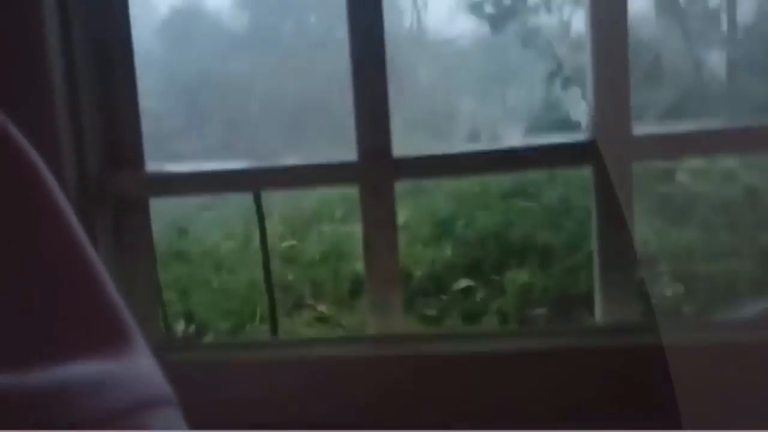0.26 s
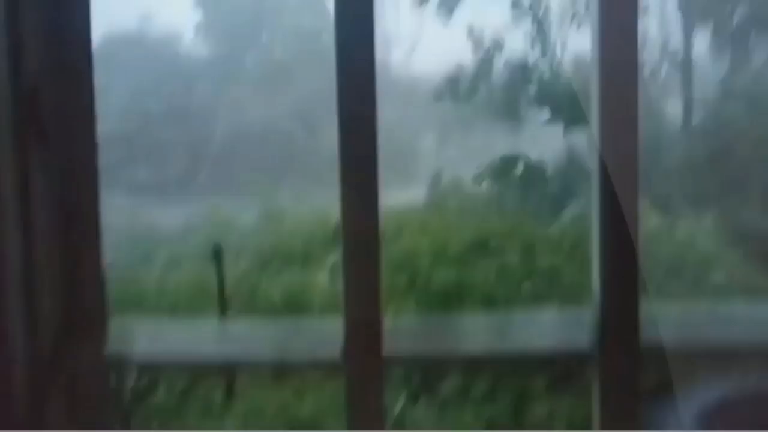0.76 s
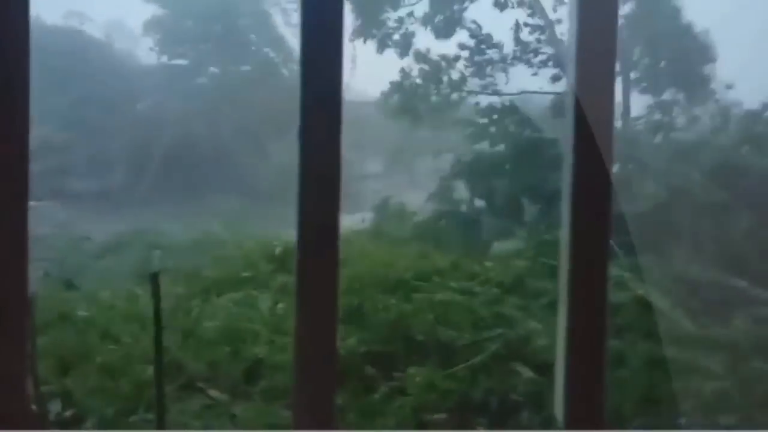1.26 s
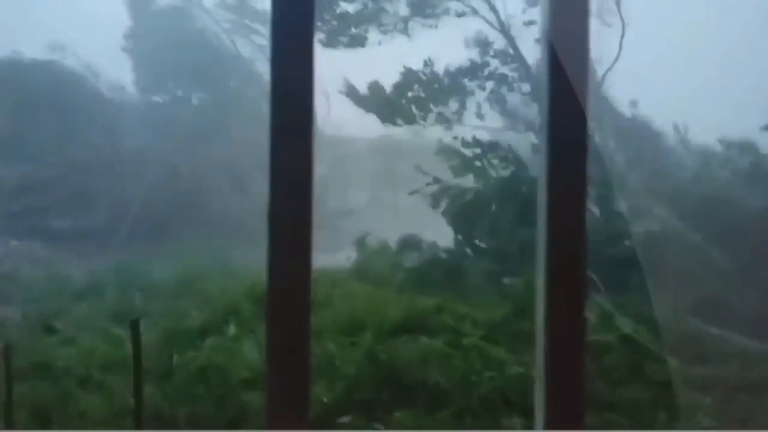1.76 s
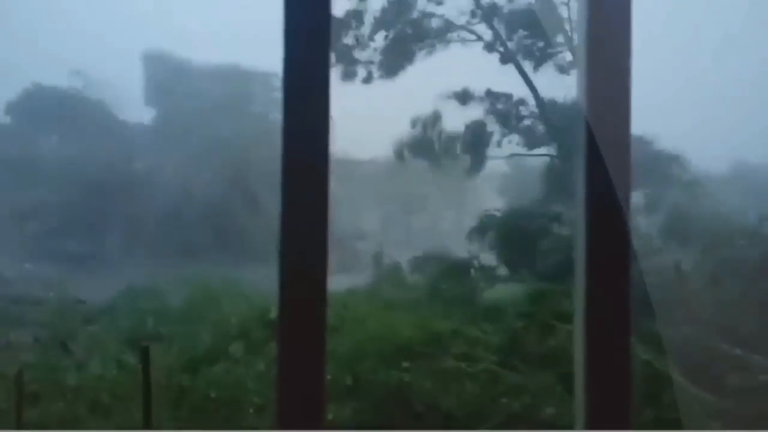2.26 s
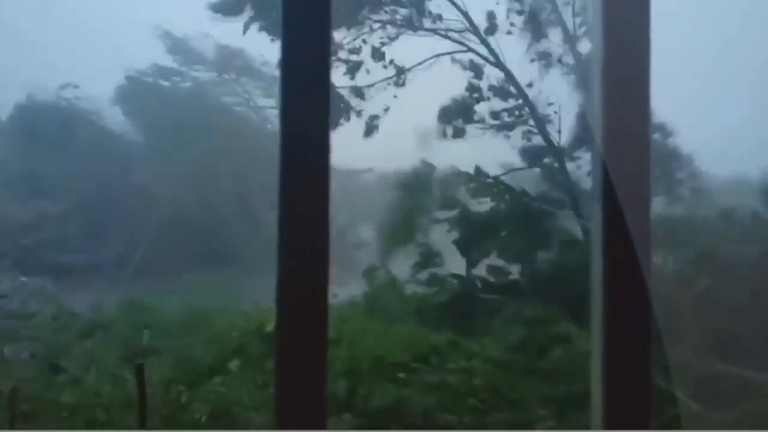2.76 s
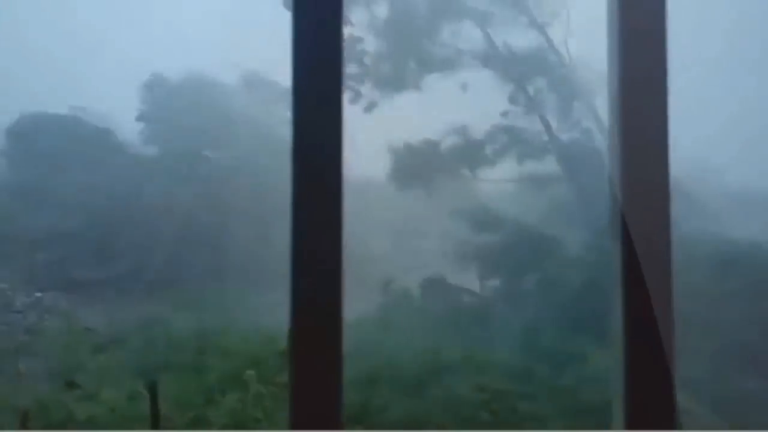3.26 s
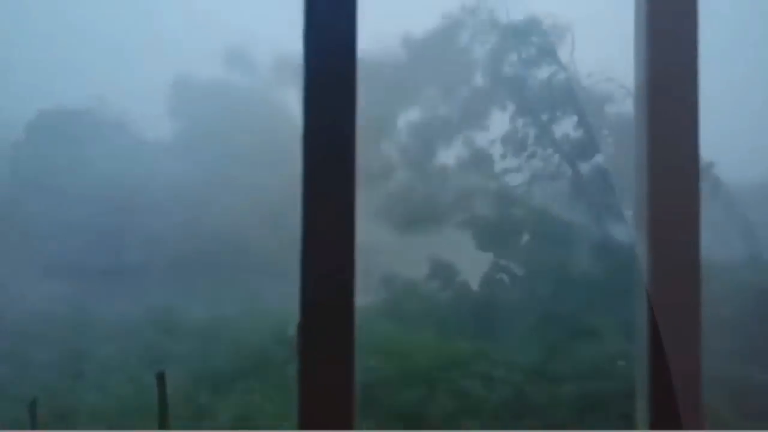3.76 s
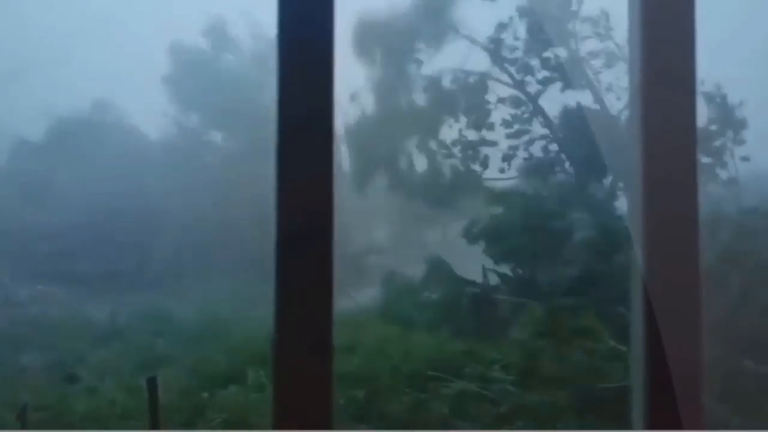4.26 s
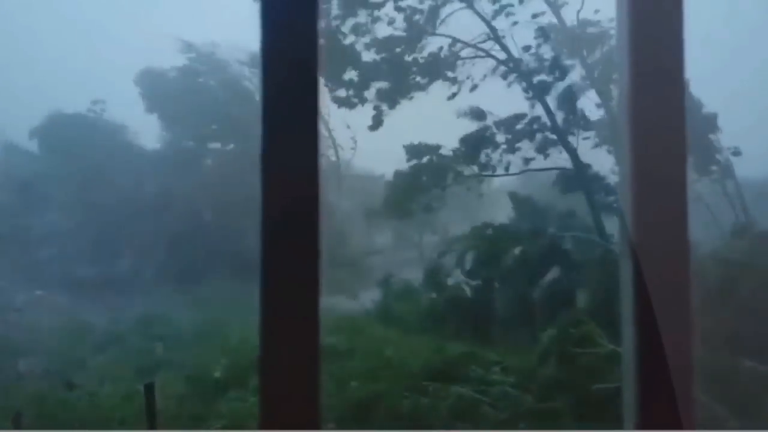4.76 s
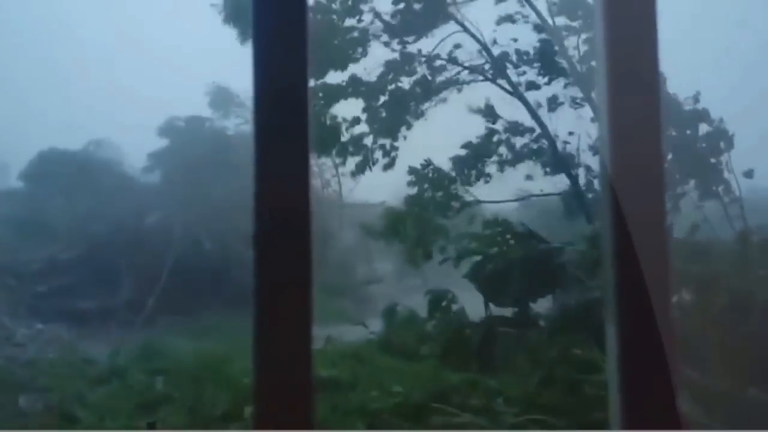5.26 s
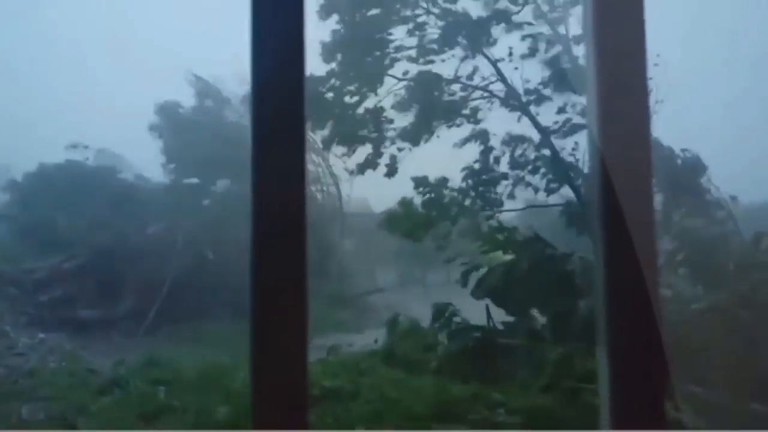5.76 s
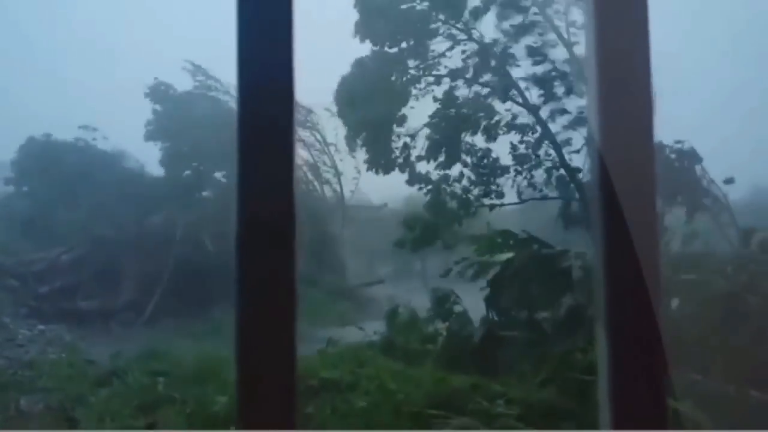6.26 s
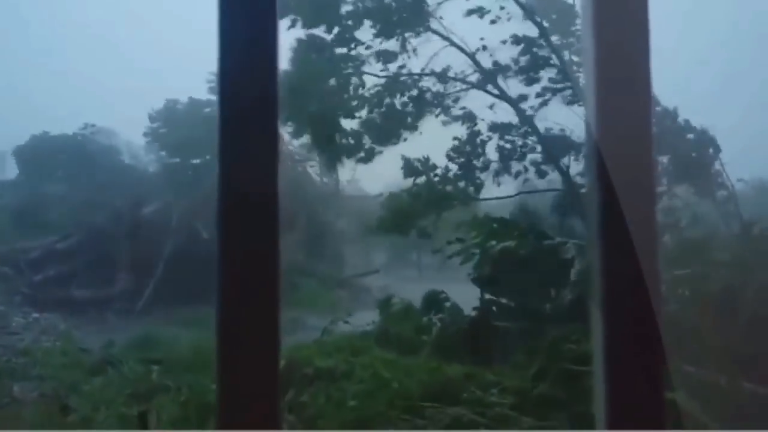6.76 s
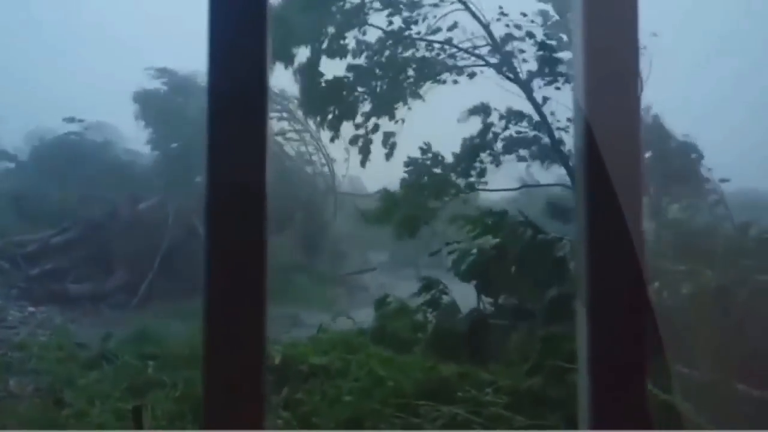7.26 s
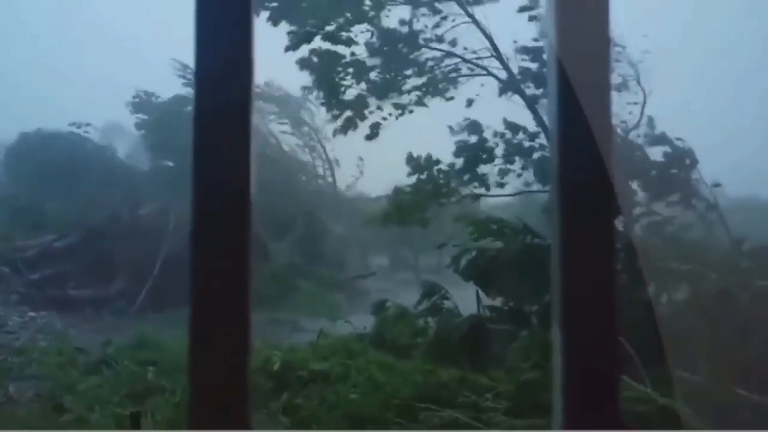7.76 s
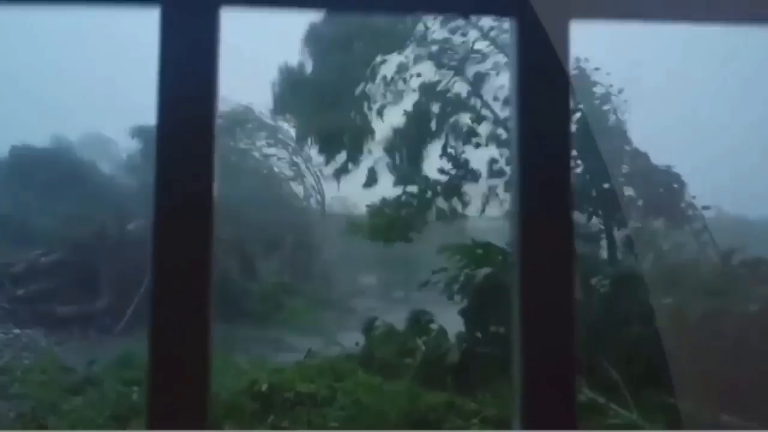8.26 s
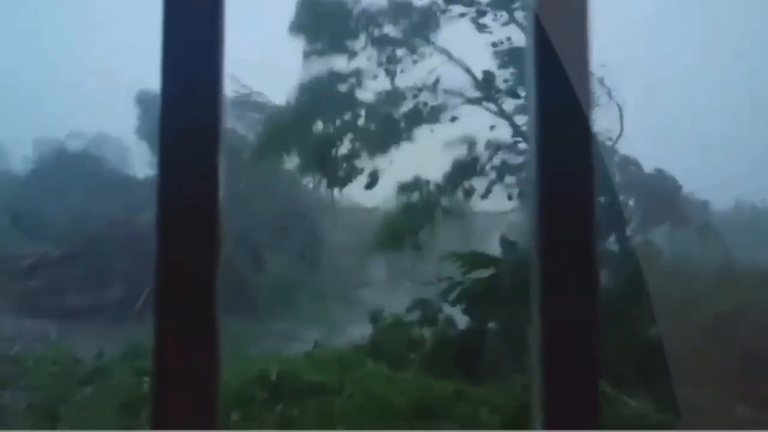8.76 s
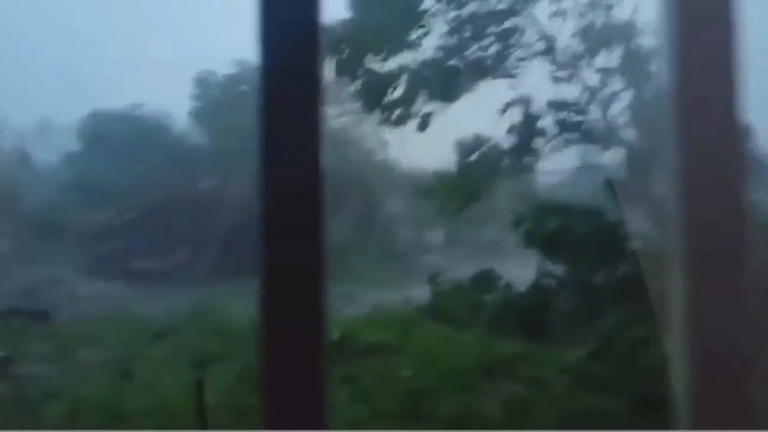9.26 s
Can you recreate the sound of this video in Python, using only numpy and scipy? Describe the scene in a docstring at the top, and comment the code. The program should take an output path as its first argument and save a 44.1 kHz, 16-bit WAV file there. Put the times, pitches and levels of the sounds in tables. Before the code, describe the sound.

A violent storm heard from inside a house near a window. Wind roars low in the trees, moans around the walls and howls with a wavering mid pitch, under a dense rush and hiss of rain. Water spatters sharply on the glass at the start, soon after, and again around the middle. The rain strengthens early and stays heavy. A hand-held microphone gives a soft rub and knocks near three seconds.

```python
"""Hurricane behind a house window

Wind roars in the trees, moans round the house and howls at the window: noise shaped by broad resonances.
Rain rushes and hisses against the wall: turbulent noise mixed with random single drops, under a fine mist.
Sharp gusts fling volleys of drops at the ringing pane and whistle in a gap; the storm's level shifts after most.
The hand-held microphone is jostled briefly: a rub of the grip and soft low knocks on its case."""
import sys
import numpy as np
from scipy import signal
from scipy.fft import rfft, irfft
from scipy.io import wavfile
from scipy.ndimage import map_coordinates

SR = 44100
rng = np.random.default_rng(int(sys.argv[2]) if len(sys.argv) > 2 else 0)


def store_wav(level_fs):
    """Save 16-bit WAV to argv[1]."""
    pcm = np.round(np.clip(np.atleast_2d(level_fs), -1, 1) * 32767)
    wavfile.write(sys.argv[1], SR, pcm.T.astype(np.int16))


N = 418950
TIME = np.arange(N) / SR   # seconds
FREQS = np.maximum(np.fft.rfftfreq(N, 1 / SR), 1)   # Hz, kept above zero for the logarithms

# Gusts that fling water at the pane. Each row: start in seconds, rise in seconds, decay in seconds,
# volley level in dB, pane pitch in Hz, whistle pitch at its loudest in Hz, whistle half-width in Hz,
# whistle level in dB, brief treble level drop in dB (negative: a lift), lull in dB (negative: a swell),
# lull length in seconds.
GUSTS = [(0.0, 0.0042, 0.11, -11.5, 930, 1850, 145, -29, 1, 0, 0.28),
         (0.329, 0.0097, 0.046, -16, 1060, 1660, 35, -24, 0.5, 0, 0.48),
         (1.07, 0.0057, 0.026, -16, 974, 2150, 151, -32, 0, -2, 0.88),
         (4.522, .04, 0.073, -16, 1030, 1820, 130, -19, 3.5, 4.5, 0.79),
         (5.509, 0.013, 0.05, -16, 1010, 2400, 450, -20, 11, 6, 1.04),
         (6.204, 0.014, 0.068, -16.5, 870, 1150, 100, -30, -1, -1, 0.18),
         (8.945, .02, 0.066, -32, 985, 2000, 249, -25, 1, -1.5, 0.18)]


def from_db(db):
    """Level is logarithmic: 20 dB is a tenfold amplitude."""
    return 10 ** (np.asarray(db) / 20)


def rms_one(x):
    """Mean-square normalisation: scale to unit power."""
    return x / np.sqrt(np.mean(x ** 2) + 1e-20)


def in_time(rows):
    """Linear interpolation: every column after the time column, read at each sample."""
    seconds, *columns = np.transpose(rows)
    return [np.interp(TIME, seconds, column) for column in columns]


def colour(points):
    """Spectral envelope: gain from (Hz, dB) points on a log-frequency axis, falling steeply past the ends."""
    hz, db = np.transpose(points)
    outside = np.minimum(FREQS / hz[0], 1) * np.minimum(hz[-1] / FREQS, 1)
    return from_db(np.interp(np.log(FREQS), np.log(hz), db)) * outside ** 4


def resonances(modes, base_hz=1):
    """Damped modes: each peak's amplitude halves about one width from its centre; their powers add."""
    power = 0
    for place, width, db in modes:
        detuning = (FREQS ** 2 - (place * base_hz) ** 2) / (2 * FREQS * width)
        power = power + (from_db(db) / (1 + detuning ** 2)) ** 2
    return np.sqrt(power)


def drift(rate):
    """Low-passed chance: a random wander of spread 1, weakened above rate in Hz."""
    spectrum = rfft(rng.standard_normal(N)) / (1 + (FREQS / rate) ** 2)
    return rms_one(irfft(spectrum, N))


def stereo(source, gain):
    """Mid and side decomposition: unrelated signals share a colour; a weak side part sets the width."""
    # Stereo width. Each row: frequency in Hz, side level relative to mid in dB.
    width_curve = [(200, -31.5), (1200, -53), (2800, -50.5), (4000, -18), (5200, -32), (7000, -20),
                   (9000, -12), (13000, -9)]
    balance = [np.ones(len(FREQS)), colour(width_curve)]
    mid, side = irfft(rfft(source) * gain * balance, N)
    return rms_one(np.array([mid + side, mid - side]))


def turbulence(gain, eddy_db, eddy_rate, patch_hz, size=1024):
    """Turbulent noise: patches of the time-frequency plane swell and fade as eddies pass."""
    hz, seconds, frames = signal.stft(rng.standard_normal((2, N)), SR, nperseg=size)
    places = np.meshgrid(hz / patch_hz, seconds * eddy_rate, indexing="ij")
    eddies = map_coordinates(rng.standard_normal((size, size)), places, order=1, mode="wrap")
    _, noise = signal.istft(frames * from_db(eddy_db * eddies), SR)
    return stereo(noise[:, :N], gain)


def drops(gain, per_s, size_db):
    """Poisson impacts: impulses at random times and of random sign excite a fixed spectrum."""
    # a positive size_db gives a tail of large drops, a negative one a tail of small drops
    spread = np.minimum(rng.exponential(1, (2, N)), 5)
    sizes = from_db(size_db * spread) * rng.choice([-1, 1], (2, N))
    hits = rng.random((2, N)) < per_s / SR
    return stereo(sizes * hits, gain)


def bend(x, ratio):
    """Variable-rate reading: a steady sound read faster rises in pitch, read slower it falls."""
    place = np.cumsum(ratio) % (N - 1)
    return np.array([np.interp(place, np.arange(N), channel) for channel in x])


def wind_surges():
    """Gaussian swells: decibels by which brief surges lift the moan."""
    # Each row: centre in seconds, half-width in seconds, dB added.
    surge_rows = [(.51, 0.03, 5), (4.75, 0.093, 4.5), (5.53, 0.13, 4), (6.075, 0.034, 14.5),
                  (6.24, 0.066, 11), (6.6, 0.036, 6)]
    return sum(db * np.exp(-((TIME - s) / half_width) ** 2) for s, half_width, db in surge_rows)


def tree_roar(surge_db):
    """Broadband flow noise: wind in the trees gives a low roar that follows the surges slightly."""
    # Colour of the roar. Each row: frequency in Hz, relative power density in dB.
    roar_colour = [(170, -29), (198, -8.5), (235, -3), (300, 0.5), (380, 1), (440, -5.5), (600, -1.5)]
    # Strength of the wind in the trees. Each row: time in seconds, roar level in dB before surges.
    tree_strength = [(0.0, -33), (.3, -31.5), (.7, -34.5), (1.6, -32.5), (2.0, -33.5), (2.55, -34.5),
                     (2.85, -29), (3.15, -33), (3.65, -36), (4.25, -35.5), (4.45, -32), (4.58, -39),
                     (4.71, -28.5), (4.87, -32), (5.05, -34.5), (5.4, -36), (5.57, -38), (5.75, -36),
                     (5.97, -38), (6.3, -35), (6.95, -33.5), (7.5, -35.5), (7.95, -38.5), (8.57, -30.5),
                     (9.3, -31), (9.5, -33.5)]
    roar_surge = 0.12   # share of a surge in dB that reaches the roar
    (roar_db,) = in_time(tree_strength)
    noise = turbulence(colour(roar_colour), eddy_db=2.0, eddy_rate=14.0, patch_hz=55.3)
    return from_db(roar_db + roar_surge * surge_db) * noise


def house_moan(surge_db):
    """Cavity resonance: flow noise excites the air round the house."""
    # Resonances of that air. Each row: frequency in Hz, half-width in Hz, relative level in dB.
    air_modes = [(485, 64, -7.5), (635, 85, 1), (790, 54, 0)]
    # Strength of the wind round the house. Each row: time in seconds, moan level in dB before surges and lulls.
    house_strength = [(0, -30), (.5, -30), (.7, -36), (.9, -33.5), (1.3, -29.5), (1.8, -33.5), (2.2, -26.5),
                      (2.6, -30.5), (3.0, -29.5), (3.6, -33), (3.85, -32.5), (4.35, -37), (4.6, -28),
                      (5.0, -31), (5.6, -28.5), (5.9, -35), (6.5, -30), (7.0, -35), (7.3, -30.5),
                      (7.9, -34), (8.45, -27), (9.5, -33.5)]
    (moan_db,) = in_time(house_strength)
    noise = turbulence(resonances(air_modes), eddy_db=4.0, eddy_rate=16.0, patch_hz=68.5)
    return from_db(moan_db + surge_db) * noise


def window_howl():
    """Shear-driven resonance: window gaps howl at a pitch that slowly rises and sags, wavering slightly."""
    # Resonances of the gaps. Each row: multiple of the howl's pitch, half-width in Hz before bending,
    # relative level in dB.
    gap_modes = [(.815, 90, -5.5), (1, 110, 0), (1.12, 90, -14)]
    # Strength of the wind at the window. Each row: time in seconds, howl level in dB before lulls.
    window_strength = [(0.15, -27), (0.45, -22), (0.8, -26), (1.15, -20.5), (1.65, -25), (2.15, -20),
                       (2.6, -25), (2.9, -22.5), (4.3, -23.5), (4.7, -24.5), (5.12, -24.5), (5.3, -22),
                       (5.9, -23), (7.05, -20), (7.7, -23), (8.1, -19), (8.65, -24), (9.1, -21), (9.5, -23)]
    # Rise and sag of the howl. Each row: time in seconds, pitch in Hz before wavering.
    pitch_curve = [(0, 974), (1.0, 997), (1.85, 1028), (2.4, 986), (3.0, 1001), (4.55, 1005), (4.9, 952),
                   (5.55, 1026), (6.15, 958.6), (6.7, 1006), (7.6, 1011), (8.0, 981), (8.85, 1004),
                   (9.3, 955), (9.5, 1015)]
    steady_hz = 995   # pitch before bending
    waver, waver_hz = .02, 4   # random spread as a share of the pitch, rate in Hz
    (howl_db,), (howl_hz,) = in_time(window_strength), in_time(pitch_curve)
    gaps = turbulence(resonances(gap_modes, steady_hz), eddy_db=2.5, eddy_rate=14.0, patch_hz=55.2)
    ratio = howl_hz / steady_hz * (1 + waver * drift(waver_hz))
    return from_db(howl_db) * bend(gaps, ratio)


def house_rumble():
    """Low resonance: a very faint, fluttering rumble of the house centred on 70 Hz."""
    flutter_db = 2.9 * drift(7.0)
    noise = turbulence(resonances([(70, 67, 0)]), eddy_db=5.0, eddy_rate=15.0, patch_hz=60)
    return from_db(-84 + flutter_db) * noise


def wind(lull_db):
    """Superposition: roar and rumble add to a moan and howl that share one amplitude modulation."""
    wind_lull = 0.41   # share of a lull in dB that reaches moan and howl
    surge_db = wind_surges()
    buffets = from_db(0.45 * drift(8.6) - wind_lull * lull_db)
    resonant = house_moan(surge_db) + window_howl()
    return tree_roar(surge_db) + house_rumble() + buffets * resonant


def rain_rush():
    """Merged impacts: far rain blends into noise, with nearer drops pattering through it."""
    # Colour of the rush. Each row: frequency in Hz, relative power density in dB.
    rush_colour = [(500, -12.5), (800, -7.5), (1250, -0.5), (1500, -1), (2000, 0), (2500, -1.5), (2950, -6),
                   (3400, -5), (3800, -8.3), (4400, -16), (5200, -20), (7000, -25)]
    gain = colour(rush_colour)
    far = turbulence(gain, eddy_db=3.0, eddy_rate=16.0, patch_hz=100.3)
    return far + from_db(-9) * drops(gain, per_s=3500, size_db=0.5)


def rain_spray():
    """Merged impacts at higher frequencies: fine spray hisses, with single drops through it."""
    # Colour of the spray. Each row: frequency in Hz, relative power density in dB.
    spray_colour = [(2950, -7.5), (3450, -1.7), (4000, -8), (4700, -12), (5600, -12), (6400, -3.5),
                    (6950, -0.5), (7300, -0.6), (8050, -8), (8450, -6.5), (9900, -15), (10600, -31)]
    gain = colour(spray_colour)
    far = turbulence(gain, eddy_db=2.5, eddy_rate=16.0, patch_hz=129.6)
    return far + from_db(-7.0) * drops(gain, per_s=5000, size_db=0.5)


def rain_mist(spray_db, treble_drop_db):
    """Break-up of drops: harder rain shatters finer, so the top grows faster than the hiss."""
    # Colour of the finest mist. Each row: frequency in Hz, relative power density in dB.
    mist_colour = [(9500, -22), (10200, -3), (10800, 1), (11300, 2), (11680, -6.5), (12000, -1.5),
                   (12400, -2), (13000, -7.5), (13350, -12), (13600, -23)]
    mist_drop = 0.73   # extra share of the treble level drop in dB
    growth_db = 0.22 * (spray_db - np.mean(spray_db))
    mist_db = spray_db - 11.5 + growth_db - mist_drop * treble_drop_db
    return from_db(mist_db) * turbulence(colour(mist_colour), eddy_db=3.0, eddy_rate=15.0, patch_hz=246)


def rain(rush_db, spray_db, treble_drop_db):
    """Common modulation: rush, hiss and mist vary together as the rain arrives in sheets."""
    sheets = from_db(0.58 * drift(10.3))
    rush = from_db(rush_db - 0.5) * rain_rush()
    spray = from_db(spray_db - 0.07) * rain_spray()
    return sheets * (rush + spray + rain_mist(spray_db, treble_drop_db))


def gusts():
    """Impact excitation: each gust's dense volley rings the pane, and a gap whistles at a sagging pitch."""
    # Ringing of the pane. Each row: multiple of the gust's pane pitch, half-width in Hz, relative level in dB.
    pane_modes = [(.65, 200, -31), (1, 170, 8), (1.42, 580, -7), (2.38, 290, -13), (3.3, 260, -18)]
    whistle_delay, whistle_half_width = .052, 0.037   # seconds from the hit to the loudest point, seconds
    whistle_sag = .03   # share of the pitch lost per half-width of time
    out = np.zeros((2, N))
    for s, rise, decay, db, hz, whistle_hz, whistle_width, whistle_db, *_ in GUSTS:
        attack = np.clip((TIME - s) / rise, 0, 1)
        force = attack * np.exp(-np.maximum(TIME - s - rise, 0) / decay)
        volley = drops(resonances(pane_modes, hz), per_s=6800, size_db=-0.5)
        past_top = np.clip((TIME - s - whistle_delay) / whistle_half_width, -4, 4)
        gap = stereo(rng.standard_normal((2, N)), resonances([(whistle_hz, whistle_width, 0)]))
        whistle = np.exp(-past_top ** 2) * bend(gap, 1 - whistle_sag * past_top)
        out += from_db(db) * force * volley + from_db(whistle_db) * whistle
    return out


def level_drops():
    """Level envelopes in dB: a brief drop above about 3 kHz, recovering smoothly, and a half-sine lull."""
    lowest_s = 0.061   # seconds from the start to the lowest point of the treble
    treble_drop = lull = 0
    for s, *_, drop_db, lull_db, lull_s in GUSTS:   # negative values lift the level instead
        age = np.maximum(TIME - s, 0)
        treble_drop = treble_drop + drop_db * (age / lowest_s * np.exp(1 - age / lowest_s)) ** 2
        lull = lull + lull_db * np.sin(np.pi * np.clip(age / lull_s, 0, 1))
    return treble_drop, lull


def grip_rub():
    """Friction noise: the grip rubs the case once, heard as a low resonant rumble."""
    # One row: start in seconds, end in seconds, level in dB.
    start, end, grip_db = (2.77, 3.095, -46)
    fade_s = 0.025
    pressure = np.clip(np.minimum(TIME - start, end - TIME) / fade_s, 0, 1)
    spectrum = rfft(rng.standard_normal(N)) * resonances([(90, 32, 0)])
    return from_db(grip_db) * pressure * rms_one(irfft(spectrum, N))


def case_knocks():
    """Short tone bursts: each knock swells and dies within a few cycles, with an octave overtone."""
    # Each row: centre in seconds, fundamental level in dB before the swell, pitch in Hz,
    # swell half-width in seconds.
    knock_rows = [(1.564, -43, 126.7, 0.012), (2.915, -39, 88, .016), (2.991, -21, 124, 0.0055),
                  (3.023, -38, 120, .008), (4.955, -55, 126, .018)]
    octave_db = -7   # relative to the fundamental
    out = np.zeros(N)
    for s, db, hz, swell in knock_rows:
        age = TIME - s
        turn = 2 * np.pi * hz * age
        tone = np.sin(turn) + from_db(octave_db) * np.sin(2 * turn)
        out += from_db(db) * tone * np.exp(-(age / swell) ** 2)
    return out


def room(x):
    """Comb filtering: faint delayed copies off the walls put a fine ripple on the storm's colour."""
    # Early echoes. Each row: delay in seconds, level in dB.
    echo_rows = [(.0071, -28), (0.013, -21.5), (0.02, -18), (0.027, -22), (0.039, -34)]
    echoes = sum(from_db(db) * np.exp(-2j * np.pi * FREQS * delay) for delay, db in echo_rows)
    return x + irfft(rfft(x) * echoes, N)


def scene():
    """Superposition: the storm comes through the window into the room; handling noise adds without echoes."""
    # Strength of the rain. Each row: time in seconds, rush level in dB, spray hiss level in dB,
    # both before lulls, treble level drops and the small trims in rain().
    rain_strength = [(0, -25.5, -28), (0.27, -21.5, -22), (0.72, -21.5, -22.5), (.95, -18, -19.5),
                     (1.65, -22.5, -23), (1.85, -17, -19.5), (2.1, -18, -22.5), (2.5, -18.5, -22),
                     (3.1, -16.5, -19.5), (3.55, -18.5, -19), (4.0, -19, -20.5), (4.45, -20, -20),
                     (4.75, -18, -22), (5.0, -18.7, -26), (5.45, -18, -22), (5.8, -16, -21),
                     (6.25, -17.5, -25), (6.7, -18.3, -21), (7.1, -18.5, -24.5), (7.6, -18, -20),
                     (8.4, -18.5, -24), (8.9, -18.5, -22), (9.5, -18, -22.5)]
    spray_lull = 0.62   # share of a lull in dB that reaches the spray
    treble_drop_db, lull_db = level_drops()
    rush_db, spray_db = in_time(rain_strength)
    downpour = rain(rush_db - lull_db, spray_db - spray_lull * lull_db - treble_drop_db, treble_drop_db)
    storm = wind(lull_db) + downpour + gusts()
    return room(storm) + grip_rub() + case_knocks()


def record(dry):
    """Band limiting: a steep elliptic low-pass cuts the top above 13700 Hz."""
    low_pass = signal.ellip(12, .1, 90, 13700, fs=SR, output="sos")
    return signal.sosfilt(low_pass, dry)


dry = scene()
out = record(dry)
store_wav(out)
```